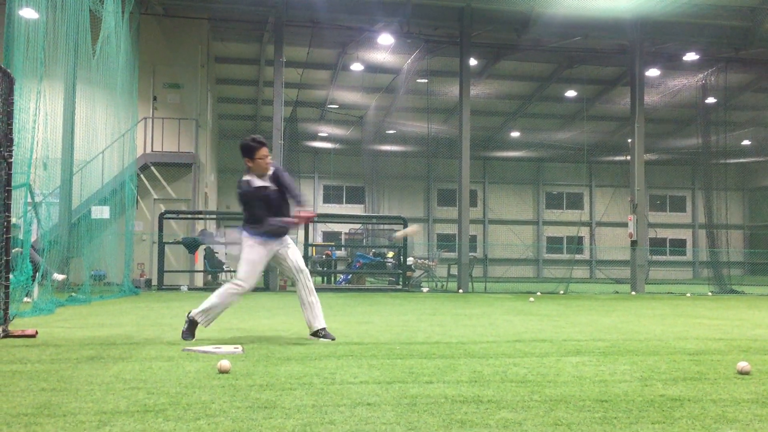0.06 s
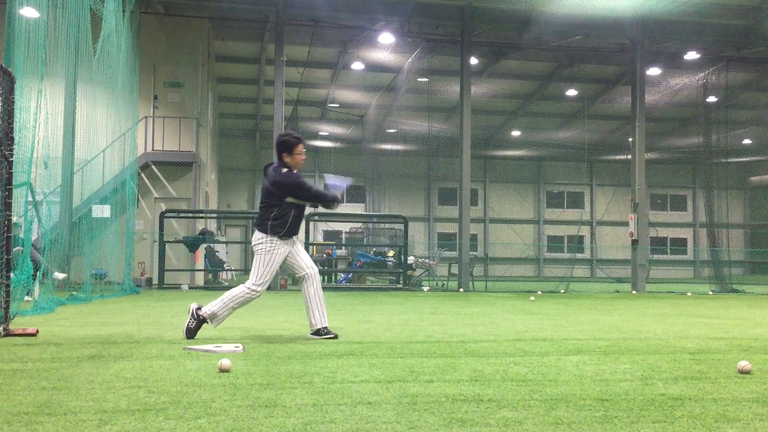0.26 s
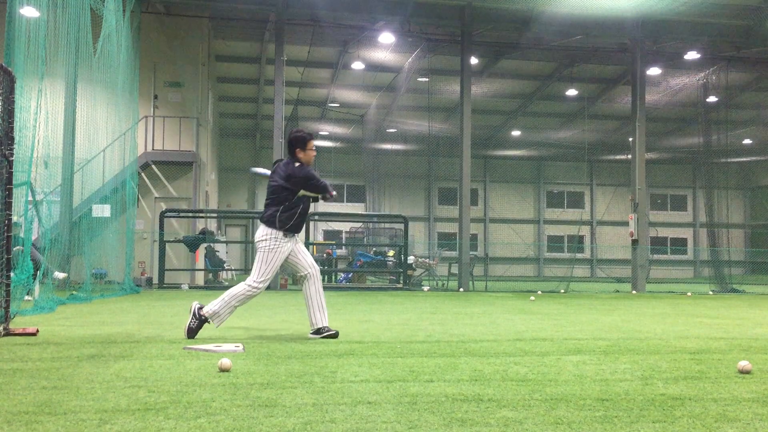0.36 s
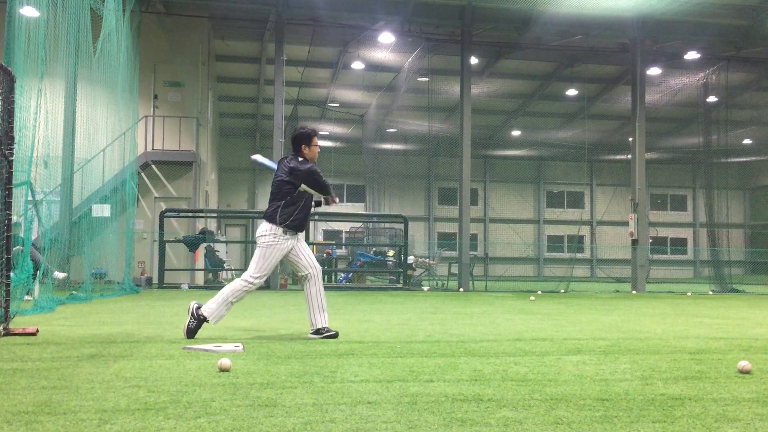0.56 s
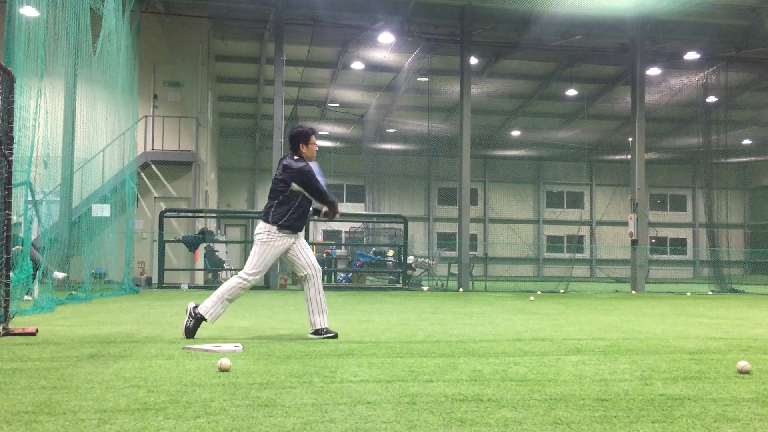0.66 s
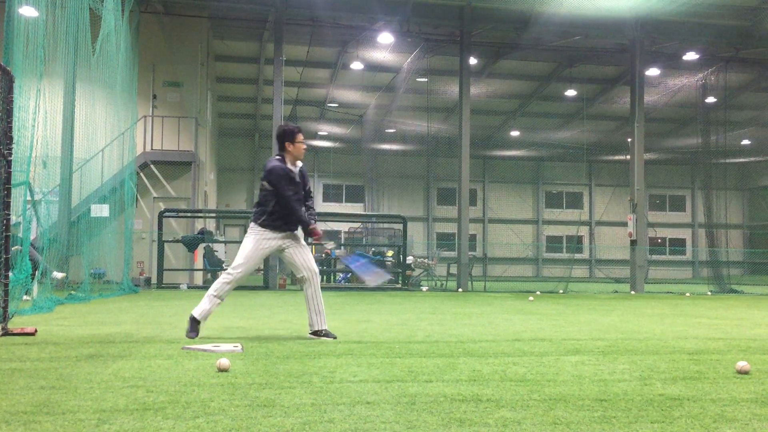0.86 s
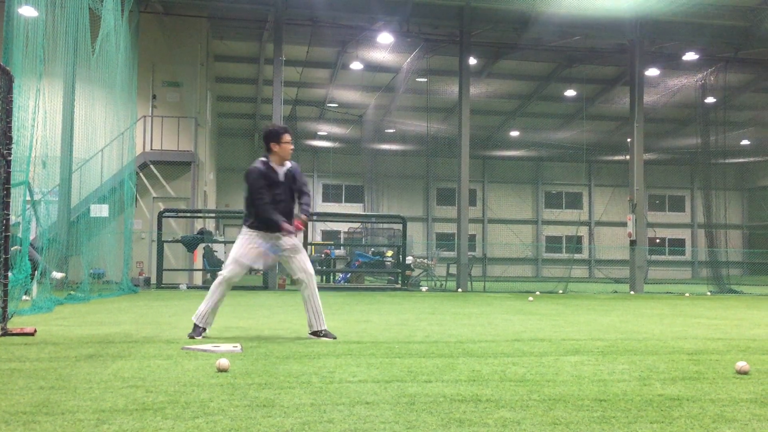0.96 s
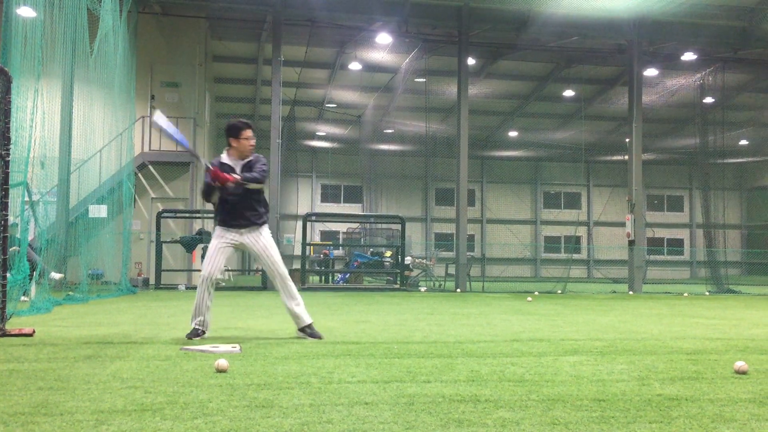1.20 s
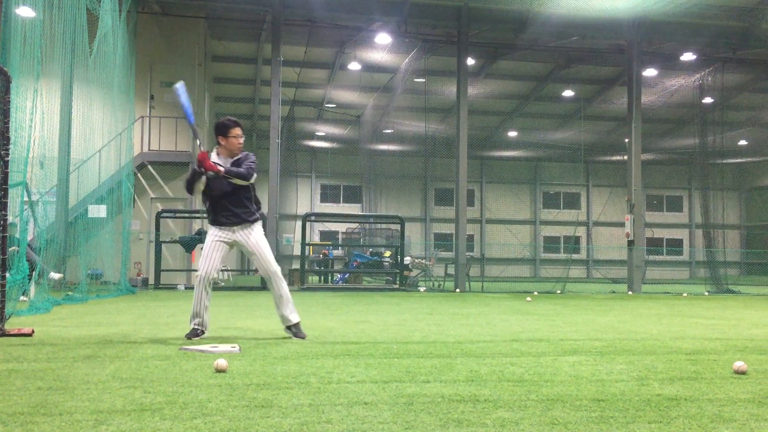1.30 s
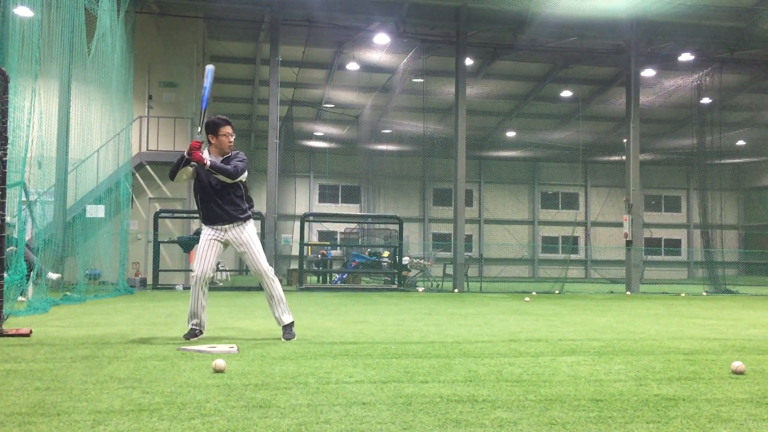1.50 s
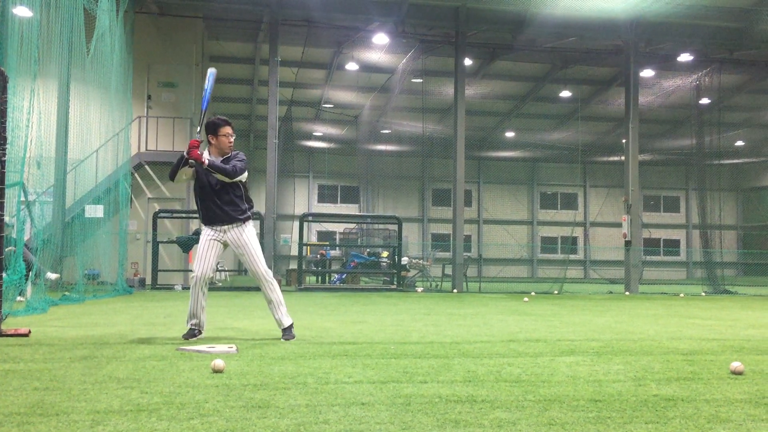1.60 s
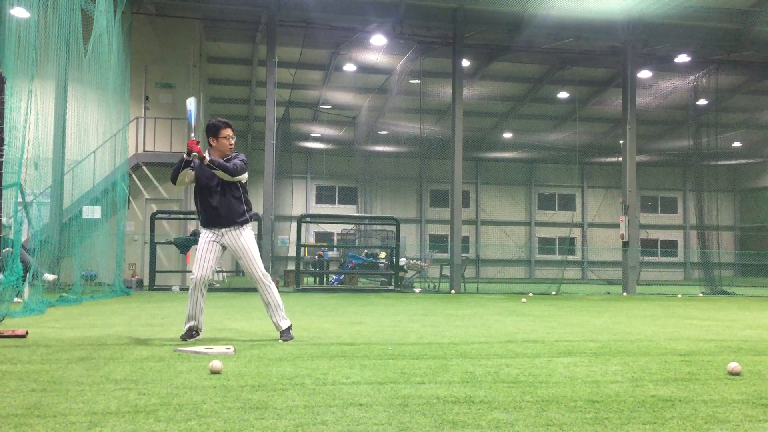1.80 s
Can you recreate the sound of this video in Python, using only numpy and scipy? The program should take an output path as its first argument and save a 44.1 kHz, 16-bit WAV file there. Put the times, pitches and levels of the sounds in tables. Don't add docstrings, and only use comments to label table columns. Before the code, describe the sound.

A hollow metal bat cracks a baseball with a bright ping ringing through a large indoor hall

```python
import sys
import numpy as np
from scipy import signal
from scipy.fft import irfft
from scipy.io import wavfile

SR = 44100
rng = np.random.default_rng(int(sys.argv[2]) if len(sys.argv) > 2 else 0)


def gain_from_db(level_db):
    decades = np.asarray(level_db, float) / 20
    return 10 ** decades


def persist_wave(psi):
    counts = np.round(np.clip(psi, -1, 1) * 32767).astype(np.int16)
    wavfile.write(sys.argv[1], SR, np.atleast_2d(counts).T)


N = 81585
T = np.arange(N) / SR
HIT_S = .2484

# t/s, level/dB
RUMBLE_SWELL = [(0, -43), (.4, -45.5), (.8, -43.5), (1.1, -41.5), (1.35, -38.5), (1.6, -39.5), (1.85, -41)]
# f/Hz, density/dB per Hz
RUMBLE_COLOUR = [(15, -62.5), (25, -4), (86, -2.5), (252, -16), (312, -9.5), (441, -25.5), (918, -20),
                 (1030, -17), (2500, -83), (3250, -81.5), (5500, -120)]
# t/s, level/dB
SWISH_SWELL = [(0, -71), (.07, -62), (.1, -61), (.15, -56), (.19, -61.5), (.245, -51.5), (.3, -88.5),
               (.85, -73), (1.05, -55.5), (1.3, -69.5), (1.85, -70)]
# f/Hz, density/dB per Hz
SWISH_COLOUR = [(710, -34), (1200, 9), (1440, 11), (1570, -1.5), (1980, 1.5), (3910, -2), (16000, -20.5)]
# f/Hz, t60/s
HALL_T60 = [(150, 2.1), (500, 1.3), (1200, 1.6), (2000, 2.36), (3000, 1.677), (5000, 1.04), (8000, 0.62),
            (15000, 0.21)]
# delay/s, level/dB, low-pass f/Hz, smear/s
ECHOES = [
    (.0042, -9, 9000, .0004),
    (.0247, -1, 2200, .0006),
    (.0325, -4, 9000, .0012),
    (.07, -12, 5000, .002),
]
# t/s, level/dB
CLATTER_SWELL = [(1.141, -90), (1.143, -47), (1.16, -48), (1.177, -42), (1.2, -52), (1.215, -51),
                 (1.26, -64), (1.36, -90)]
# f/Hz, density/dB per Hz
CLATTER_COLOUR = [(1500, 3), (2400, -4), (3300, -1.5), (4500, -5.5), (6000, -9), (8000, -15), (11000, -19),
                  (15000, -19)]
# t/s, level/dB
KNOCKS = [
    (1.1425, -39),
    (1.170, -43),
    (1.175, -35),
]
# f/Hz, level/dB, t60/s
FRAME_MODES = [(600, -8, .03), (2400, -6, .008), (3200, -2, .015), (5800, -5, .005), (7400, -5, .005),
               (12000, -16, .004)]
# f/Hz, level/dB
BLOW_COLOUR = [(150, -5), (500, -2), (1200, 3.5), (2300, 6.5), (3600, -12), (6500, -6), (9000, -13),
               (15000, -17)]
# f/Hz, level/dB, t60/s
TAIL_MODES = [(3137, -39, 0.011), (4116, -45.5, 0.0079), (5540, -42.5, 0.0087)]
# t/s, f/Hz, level/dB
PING = [
    (.252, 1850, -26),
    (.266, 1868, -17),
    (.279, 1868, -22),
    (.284, 1869, -7),
    (.312, 1870, -8),
    (.318, 1870, -19),
    (.34, 1900, -30),
    (.4, 2020, -25),
    (.47, 1920, -32),
]
# f/Hz, level/dB, t60/s
BARREL_MODES = [(275, -19, .045), (710, -19, .035), (1170, -19, .035), (1830, -9, .03), (2300, -4, .009),
                (3080, -13, .045), (3800, -14, .025), (4630, -21, .02), (5400, -23, .025),
                (6200, -20, .012), (7100, -24, .012), (8600, -23, .006), (12800, -18, .003),
                (930, -19, .03)]


def at_hz(points, hz):
    table_hz, values = np.transpose(points)
    return np.interp(np.log(hz), np.log(table_hz), values)


def in_time(rows):
    s, *columns = np.transpose(rows)
    return [np.interp(T, s, column) for column in columns]


def butter(x, order, hz, kind):
    return signal.sosfilt(signal.butter(order, hz, kind, fs=SR, output="sos"), x)


def drift(rate):
    r = np.exp(-80 * np.pi * rate / SR)
    white = rng.standard_normal(N // 40 + 2002)
    slow = signal.lfilter([1], [1, -2 * r, r * r], white)[2000:]
    return np.interp(np.arange(N) / 40, np.arange(len(slow)), slow / slow.std())


def bands(gain, white=None):
    edges = 20 * 2 ** np.arange(0, 10.1, 1 / 3)
    if white is None:
        white = rng.standard_normal((2, N + 8000))
    out = 0
    for k, (lo, hi) in enumerate(zip(edges, edges[1:])):
        band = butter(white[k % 2], 3, [lo, hi], "band")[-N:]
        out = out + gain(np.sqrt(lo * hi)) * band
    return out


def steady(colour, patchy_db, white=None):
    lo, hi = colour[0][0], colour[-1][0]

    def gain(hz):
        octaves_outside = np.log2(max(lo / hz, hz / hi, 1))
        return gain_from_db(at_hz(colour, hz) + patchy_db * drift(4.65) - 14 * octaves_outside)

    x = bands(gain, white)
    return x / x.std()


def strike(modes, hits, scatter_db):
    s, hit_db = np.transpose(hits)
    chance = rng.standard_normal((len(modes), len(s)))
    out = 0
    for k, (hz, level_db, t60) in enumerate(modes):
        clicks = np.full(N, 1e-18)
        sign = (-1) ** k
        clicks[(s * SR).astype(int)] = sign * gain_from_db(hit_db + level_db + scatter_db * chance[k])
        r, w = gain_from_db(-60 / (t60 * SR)), 2 * np.pi * hz / SR
        out = out + signal.lfilter([0, np.sin(w)], [1, -2 * r * np.cos(w), r * r], clicks)
    return out


def hiss():
    return gain_from_db(-79) * rng.standard_normal(N)


def rumble():
    return gain_from_db(in_time(RUMBLE_SWELL)[0]) * steady(RUMBLE_COLOUR, patchy_db=1.0)


def swish():
    return gain_from_db(in_time(SWISH_SWELL)[0]) * steady(SWISH_COLOUR, patchy_db=1.5)


def hall(x):
    delay_s, rise_s = .012, .012
    swell = 1 - np.exp(-np.maximum(T - delay_s, 0) / rise_s)
    tail = swell * bands(lambda hz: gain_from_db(-60 * T / at_hz(HALL_T60, hz)))
    return signal.fftconvolve(x, tail)[:N]


def echoes(x):
    out = 0
    for delay, db, hz, smear_s in ECHOES:
        smear = rng.standard_normal(500) * np.exp(-T[:500] / smear_s)
        late = np.interp(T - delay, T, x, left=0)
        dull = butter(late, 1, hz, "low")
        out = out + gain_from_db(db) * np.convolve(dull, smear / np.linalg.norm(smear))[:N]
    return out


def clatter():
    ticks_per_s, spread_db = 9000, 1.5
    happens = rng.random((2, N)) < ticks_per_s / SR
    strength = rng.standard_normal((2, N)) * gain_from_db(spread_db * rng.exponential(1, (2, N)))
    ticks = happens * strength + 1e-18
    return gain_from_db(in_time(CLATTER_SWELL)[0]) * steady(CLATTER_COLOUR, patchy_db=6.5, white=ticks)


def far_knock():
    return strike(FRAME_MODES, KNOCKS, scatter_db=3)


def blow_to_walls():
    shape = irfft(gain_from_db(at_hz(BLOW_COLOUR, np.linspace(1, SR / 2, 513))))
    click = np.zeros(N)
    click[int(HIT_S * SR) + np.arange(-512, 512)] = np.roll(shape, 512)
    return gain_from_db(-17.5) * click + strike(TAIL_MODES, [(HIT_S, 0)], scatter_db=8)


def ping_to_walls():
    rest_hz, second_hz, second_db = 1945, 3130, 0
    swing_hz, half_turn_s = 80, .24
    rise_s, t60_s = .06, 0.97
    t = np.maximum(T - HIT_S, 0)
    pitch_ratio = 1 - swing_hz / rest_hz * np.cos(np.pi * t / half_turn_s)
    bent_time = np.cumsum(pitch_ratio) / SR
    hoop = np.sin(2 * np.pi * rest_hz * bent_time)
    second = gain_from_db(second_db - 200 * t) * np.sin(2 * np.pi * second_hz * bent_time)
    return (1 - np.exp(-(t / rise_s) ** 2)) * gain_from_db(-60 * t / t60_s) * (hoop + second)


def ping():
    wobble_db, fade_db_per_s = 1.0, 150
    hz, db = in_time(PING)
    db = db + wobble_db * drift(84) - fade_db_per_s * np.maximum(T - PING[-1][0], 0)
    tone = np.sin(2 * np.pi * np.cumsum(hz) / SR)
    return (T > HIT_S) * np.sqrt(2) * gain_from_db(db) * tone


def puff():
    level_db, t60_s = -13, 0.028
    t = T - HIT_S
    fade = (t > 0) * gain_from_db(level_db - 60 * np.maximum(t, 0) / t60_s)
    return butter(fade * rng.standard_normal(N), 1, [294, 6800], "band")


def crack():
    u = (T - HIT_S) / .00004
    snap = gain_from_db(-4) * (u * u - 1) * np.exp(-u * u / 2)
    x = snap + puff() + strike(BARREL_MODES, [(HIT_S, 0)], scatter_db=0)
    return butter(x, 2, 120, "high")


def scene():
    hit, knock, rattle = crack(), far_knock(), clatter()
    thin_rattle = butter(rattle, 1, 3546, "high")
    bat_send = blow_to_walls() + gain_from_db(-47) * ping_to_walls()
    frame_send = gain_from_db(-45) * knock + gain_from_db(-34.5) * thin_rattle
    wet = hall(bat_send + frame_send)
    background = rumble() + swish() + hiss()
    return (background + wet + knock + rattle + echoes(hit) + ping() + hit)[None]


def top_cut(x):
    return signal.sosfilt(signal.butter(12, 17080, fs=SR, output="sos"), x)


def record(dry):
    x = butter(dry, 4, 54, "high")
    x = .85 * np.tanh(x / .85)
    x = signal.sosfilt(signal.cheby2(12, 60, 16400 * 1.04, fs=SR, output="sos"), x)
    return top_cut(x)


dry = scene()
out = record(dry)
persist_wave(out)
```